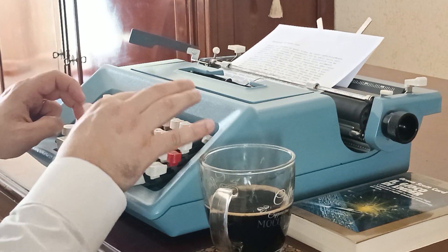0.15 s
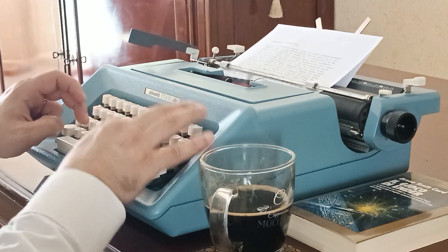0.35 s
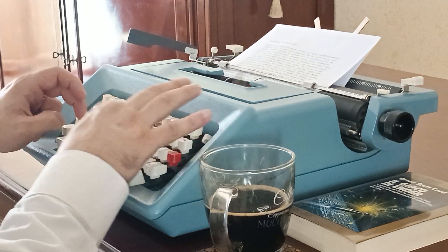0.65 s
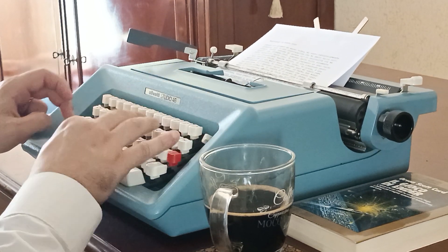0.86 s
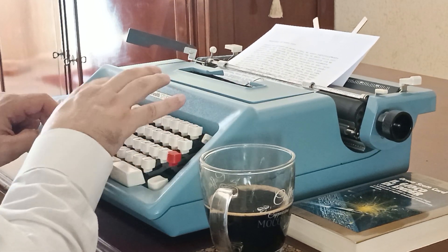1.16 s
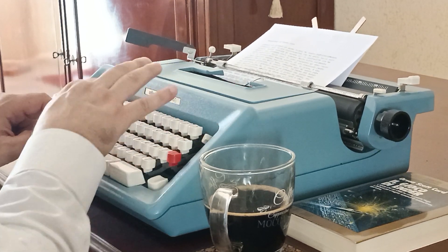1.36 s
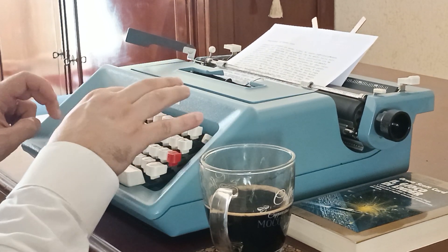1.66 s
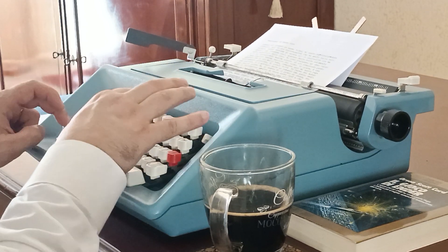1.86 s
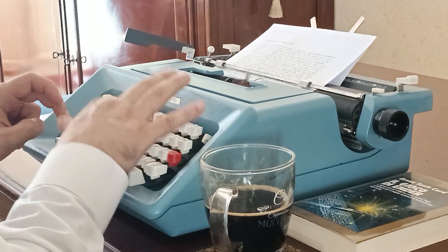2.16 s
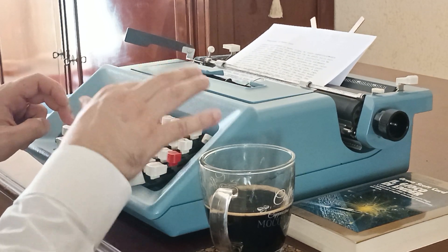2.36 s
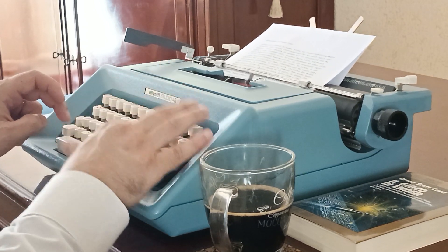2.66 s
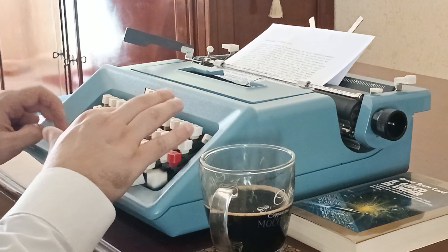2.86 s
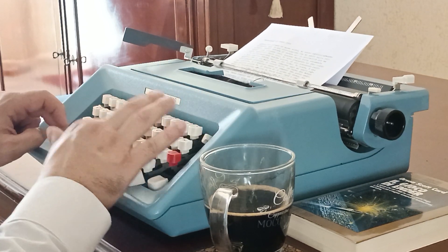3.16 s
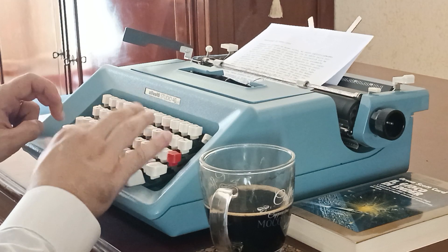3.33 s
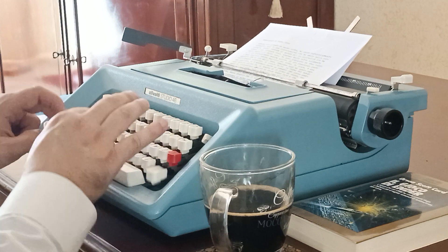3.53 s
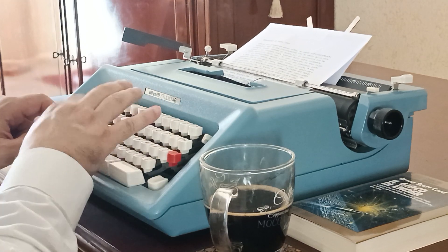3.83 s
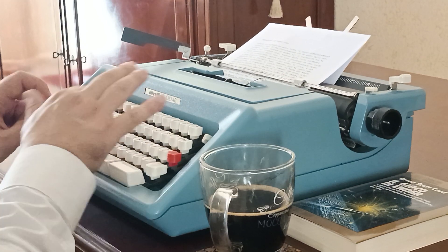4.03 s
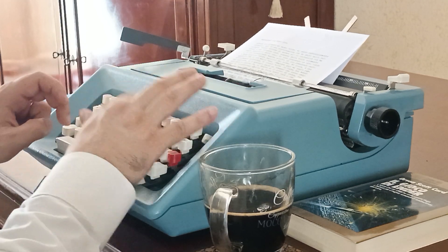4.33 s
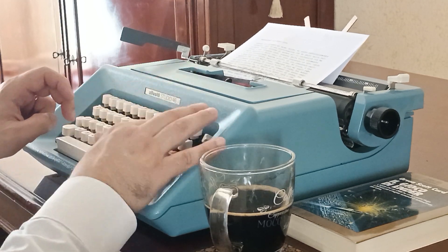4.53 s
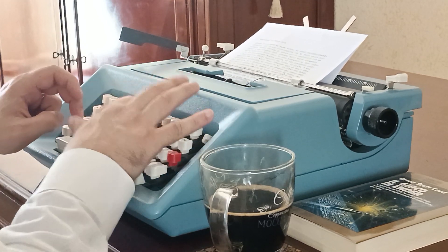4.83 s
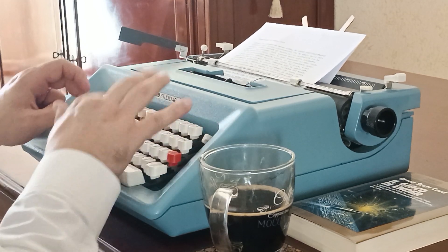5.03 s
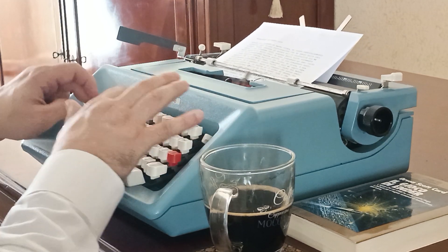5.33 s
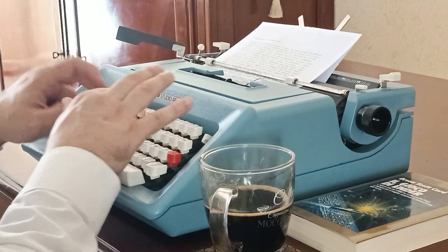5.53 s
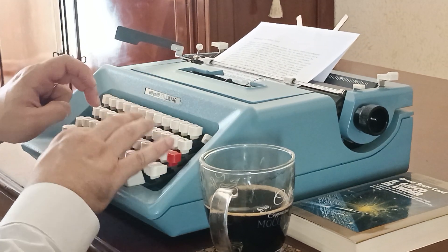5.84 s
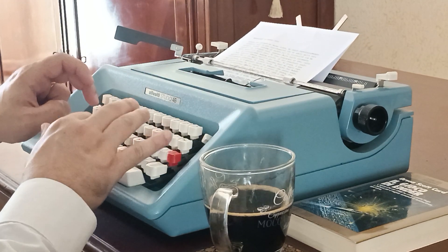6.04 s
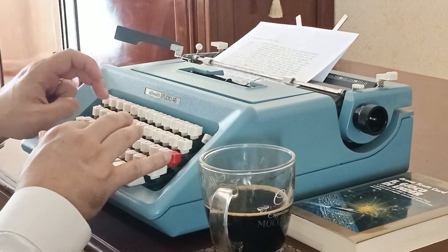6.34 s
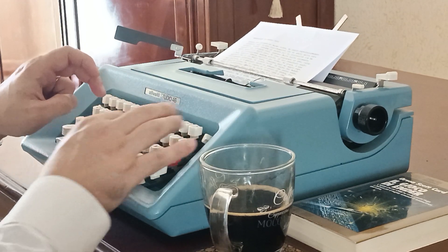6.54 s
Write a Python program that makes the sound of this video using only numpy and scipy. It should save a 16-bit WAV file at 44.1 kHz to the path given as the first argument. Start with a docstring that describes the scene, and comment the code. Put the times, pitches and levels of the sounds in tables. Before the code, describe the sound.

Close manual typewriter in a small quiet room: fifteen sharp, bright key clacks, unevenly spaced, with dull carriage clunks and small lever ticks between.

```python
"""A manual typewriter on a wooden desk in a small quiet room, close to a stereo microphone.
Each letter: the key goes down, the slug slaps the platen, the carriage steps on, the typebar drops back.
Space bar and shift linkage knock in between. Blows are coloured noise chatter; platen, linkage, case
and desk are dying modes. Each layer gets near echoes and a room tail, over a soft swelling noise."""
import sys
import numpy as np
from scipy import signal
from scipy.fft import rfft, irfft
from scipy.io import wavfile
from scipy.ndimage import uniform_filter1d

SR = 44100
rng = np.random.default_rng(int(sys.argv[2]) if len(sys.argv) > 2 else 0)


def wav_record(signal):
    """Record a signal, one row per channel, as 16-bit PCM in the file named by sys.argv[1]."""
    frames = np.transpose(np.atleast_2d(signal))
    bounded = np.clip(frames, -1, 1)
    # unit amplitude maps onto the largest positive 16-bit level
    quanta = np.round(bounded * 32767).astype(np.int16)
    wavfile.write(sys.argv[1], SR, quanta)


N = 295029

# Letters: (slug hit time [s], blow level [dB], slap tilt [dB per octave], extra top [dB],
# key lead before the slug [s], key rattle [dB], carriage step [dB], push into the case [dB])
LETTERS = [(0.0602, -8.5, -1.5, 0.5, 0.034, -29.5, -26, -37.5), (0.43, -6, 0.8, 0, 0.039, -34, -33, -30.5),
           (0.6956, -5, 0.3, -5, 0.038, -30.5, -23, -29), (1.3395, -6, 4, -3.5, 0.041, -35, -33.5, -30),
           (2.2285, -4.5, 0.5, -6.5, 0.036, -38, -24.5, -28),
           (2.7458, -5.5, 1.2, -2, 0.038, -32, -22.5, -29.5),
           (3.2009, -8.5, -1.5, 5.5, 0.039, -36.5, -31.5, -31.5),
           (4.002, -6, 2, 0.5, 0.038, -29.5, -31, -31), (4.372, -6.5, 0.3, 1, 0.041, -32, -24, -25),
           (4.6437, -6.5, 0.2, 1, 0.037, -32, -31.5, -27), (4.9862, -4.5, 0, -4, .0379, -40.5, -23.5, -27),
           (5.214, -7, -0.4, -1.5, 0.03, -35.5, -24, -27.5),
           (5.3932, -9.5, -0.2, 5.5, 0.036, -31.5, -23.5, -33),
           (5.5172, -6.5, -0.6, -2.5, 0.044, -30.5, -26, -29), (5.7213, -7, -1.5, -1, 0.032, -35, -22, -37)]
# Colour of the slug slapping paper and platen: (frequency [Hz], relative density [dB per Hz])
SLAP_COLOUR = [(240, -36), (400, -32), (899, -13.5), (1100, -14), (1500, -13.5), (2400, -2.5), (3370, -4),
               (3760, -10), (5550, -12), (7350, -15), (9570, -23.5), (12200, -19), (15000, -20.5),
               (15700, -46.5), (16500, -43.5)]
# Colour of the key going down: (frequency [Hz], relative density [dB per Hz])
KEY_COLOUR = [(240, -12), (400, -1.5), (1100, -14), (2290, -4.5), (3170, -11), (5460, -12.5),
              (14600, -16.5), (16500, -27)]
# Colour of the slug touching its guide: (frequency [Hz], relative density [dB per Hz])
BOUNCE_COLOUR = [(1200, -21.5), (2400, 4.5), (4500, -20)]
# Close platen modes, whose mix makes the clack throb:
# (frequency [Hz], level under the blow [dB], 60 dB decay before the closing fade [s])
PLATEN_MODES = [(2176, -32.5, 0.034), (2295, -23, 0.12), (2410, -12.5, 0.087), (2630, -14, 0.17),
                (2830, -21.5, .07), (3230, -24.5, .07), (3300, -26, 0.14)]
# Songs of the slap along the line: (frequency [Hz], first letter boost [dB], last letter boost [dB])
SLAP_SONGS = [(5400, 0, 10), (7130, 5.5, -1)]
SLUG_DB = -9  # slug chatter, relative to the blow
KEY_PUSH_DB = -6  # key into the case, relative to the slug's push
SOFT_DB_PER_OCTAVE = -3  # finger and rubber platen drive mostly the low modes
BOUNCE_S, BOUNCE_DB = 0.0085, -11.5  # rebound after the slap, relative to the blow
JINGLE_DB = -23.5  # loose levers, relative to the blow
STEP_S = 0.061  # slug on paper to carriage on the next tooth
HARD_DB_PER_OCTAVE = 0.5  # metal stops drive the upper case modes more than fingers do


def type_letters(clack, platen, tick, thud, body):
    """Key press, slap with ringing platen, slug rebound with loose levers, then the carriage step."""
    for k, letter in enumerate(LETTERS):
        hit_s, db, tilt, top_db, lead_s, key_db, step_db, push_db = letter
        key_s = hit_s - lead_s
        add(clack, key_s, blow(KEY_COLOUR, key_db, rattle_s=0.028, grain_db=5.0, rise_s=0.00099))
        push_case(body, key_s, push_db + KEY_PUSH_DB, rise_s=0.014, tilt=SOFT_DB_PER_OCTAVE)

        # one song grows and the other fades as the carriage moves along the line
        along = k / (len(LETTERS) - 1)
        songs = [(hz, first + (last - first) * along) for hz, first, last in SLAP_SONGS]
        slap = blow(SLAP_COLOUR, db + SLUG_DB, rattle_s=0.0014, grain_db=5.5,
                    tilt=tilt, top_db=top_db, songs=songs)
        add(clack, hit_s, slap)
        platen_ring = ring(PLATEN_MODES, db, spread_db=2.5, rise_s=0.0016, detune=0.012,
                           loose=0.6, size=8192)
        add(platen, hit_s, platen_ring)
        push_case(body, hit_s, push_db, tilt=SOFT_DB_PER_OCTAVE)

        bounce_s = hit_s + BOUNCE_S
        bounce = blow(BOUNCE_COLOUR, db + BOUNCE_DB, rattle_s=0.001, grain_db=2.5, rise_s=0.0004)
        add(thud, bounce_s, bounce)
        add(tick, bounce_s, knock(db + JINGLE_DB, rattle_s=0.04, grain_db=8.0))
        step_carriage(thud, body, hit_s + STEP_S, step_db, rise_s=0.0032, tilt=HARD_DB_PER_OCTAVE)


# Colour of the carriage landing on its next tooth: (frequency [Hz], relative density [dB per Hz])
STEP_COLOUR = [(250, -14.5), (450, -4), (720, -1), (1100, -11.5), (1700, -2.5), (3000, -19), (8000, -28)]
STEP_PUSH_DB = -2.5  # into the case, relative to the step


def step_carriage(thud, body, time_s, db, rise_s, tilt):
    """The carriage meets the next tooth with a dull blow and rings the case."""
    add(thud, time_s, blow(STEP_COLOUR, db, rattle_s=0.008, grain_db=1.65, rise_s=rise_s))
    push_case(body, time_s, db + STEP_PUSH_DB, tilt=tilt)


# Typebars and levers falling back on their rests: (time [s], level [dB])
DROPS = [(0.189, -29.5), (0.5546, -29.5), (0.8201, -28), (1.4519, -29), (2.347, -28.5), (2.8616, -28),
         (3.3036, -26.5), (4.1032, -21.5), (4.122, -27.5), (4.477, -27.5), (4.763, -28.5), (5.1088, -28),
         (5.3355, -27), (5.6422, -28.5), (5.85, -25.5), (5.893, -32)]
# Colour of those falls: (frequency [Hz], relative density [dB per Hz])
DROP_COLOUR = [(410, -21), (700, -7), (1300, -5), (2490, 1.5), (2700, 0.5), (8300, -8.5), (11900, -10.5),
               (15700, -13.5), (16500, -41)]
DROP_PUSH_DB = -1  # into the case, relative to the fall


def drop_typebars(tick, body):
    """Falling typebars and levers tick on their rests and push the case."""
    for time_s, db in DROPS:
        add(tick, time_s, blow(DROP_COLOUR, db, rattle_s=0.0025, grain_db=4.0, rise_s=0.0024))
        push_case(body, time_s, db + DROP_PUSH_DB)


# Space bar, and first the end of an earlier stroke at 0.0014 s: (time [s], knock level [dB],
# knock tilt [dB per octave], carriage step [dB], push into the case [dB])
STROKES = [(0.0014, -27.5, -4, -34.5, -45.5), (1.108, -35.5, 0.5, -24, -31.5),
           (1.581, -33, -5.5, -36.5, -25), (2.986, -32.5, -3, -25.5, -28), (3.374, -32, 0.5, -32.5, -25),
           (3.679, -36.5, -1, -28, -27)]
STROKE_RISE_S = 0.0007
FREED_DB_PER_OCTAVE = 4.5  # the freed carriage knocks fuller and higher


def end_stroke_and_press_space_bar(clack, thud, body):
    """The end of an earlier stroke, then the space bar: a knock, a case push and a carriage step at once."""
    for time_s, db, tilt, step_db, push_db in STROKES:
        add(clack, time_s, knock(db, rattle_s=0.005, grain_db=2.5, rise_s=STROKE_RISE_S, tilt=tilt))
        push_case(body, time_s, push_db)
        step_carriage(thud, body, time_s, step_db, STROKE_RISE_S, FREED_DB_PER_OCTAVE)


# Shift linkage clatter: (time [s], knock level [dB], knock tilt [dB per octave],
# ring of the linkage [dB], push into the case [dB])
CLATTERS = [(0.917, -33, -1.6, -37.5, -47), (0.943, -32, -1.5, -32, -37), (1.039, -31, 0, -56.5, -28),
            (1.048, -37, -4.5, -27, -38), (1.567, -23.5, 4, -58.5, -32), (3.4442, -34.5, -1.5, -53.5, -37),
            (3.475, -32, -1.5, -37, -32.5), (3.497, -42.5, -1.5, -48.5, -42), (3.583, -36.5, 1, -31, -38),
            (3.597, -32, -1, -23, -28), (6.0061, -29.5, 0, -25, -62), (6.016, -33.5, 1, -23.5, -35.5),
            (6.031, -41, 1, -25, -33)]
# Linkage modes: (frequency [Hz], relative level [dB], 60 dB decay before the closing fade [s])
LINK_MODES = [(1274, -5.5, 0.066), (1870, -4.5, 0.036), (2592, -2, 0.039), (2724, -4.5, 0.041),
              (3400, -3.5, .04)]
CLATTER_S = 0.0043  # decay constant of each knock


def clatter_shift(tick, thud, body):
    """The shift linkage knocks and rings in its own modes, and pushes the case."""
    for time_s, db, tilt, link_db, push_db in CLATTERS:
        add(tick, time_s, knock(db, CLATTER_S, grain_db=5.0, rise_s=0.3 * CLATTER_S, tilt=tilt))
        push_case(body, time_s, push_db, tilt=HARD_DB_PER_OCTAVE)
        link_ring = ring(LINK_MODES, link_db, spread_db=5.0, rise_s=0.003, tilt=2 * tilt,
                         detune=0.034, size=4096)
        add(thud, time_s, link_ring)


# Colour of the strokes above, linkage and loose levers: (frequency [Hz], relative density [dB per Hz])
KNOCK_COLOUR = [(290, -25), (500, -20.5), (1050, -16.5), (1260, -14.5), (1500, -13.5), (2730, -9),
                (9330, -23.5), (12000, -19), (15800, -28), (16500, -36.5)]


def knock(db, rattle_s, grain_db, **shape):
    """A chattering knock in one shared colour."""
    return blow(KNOCK_COLOUR, db, rattle_s, grain_db, **shape)


# Case and desk top modes: (frequency [Hz], relative level [dB], 60 dB decay before the closing fade [s])
CASE_MODES = [(70.5, -14, 0.12), (115.7, -10, 0.24), (177.1, -2, 0.11), (291.5, -12, 0.11),
              (359.2, -12.5, 0.17), (454.6, -1, 0.1), (586, -11, 0.093), (651.7, -9, 0.13),
              (746.5, -8, 0.14), (970, -12, 0.065)]


def push_case(body, time_s, db, **shape):
    """A push sets the modes of case and desk top ringing."""
    add(body, time_s, ring(CASE_MODES, db, **shape))


def blow(colour, db, rattle_s, grain_db, rise_s=1 / SR, tilt=0, top_db=0, songs=(), size=8192):
    """A dying noise chatter of small uneven contacts, filtered to the colour of the parts."""
    t = np.arange(1, size + 1) / SR
    hz = np.fft.rfftfreq(size, 1 / SR)
    noise = rng.standard_normal(size)
    unevenness = gain_of(grain_db * rng.exponential(1, size))
    envelope = (1 - np.exp(-t / rise_s)) * np.exp(-t / max(rattle_s, 1 / SR)) * (t < 0.1)
    chatter = rfft(noise * unevenness * envelope)

    # take out the chatter's own broad colour
    own_db = 10 * np.log10(uniform_filter1d(abs(chatter) ** 2, size=61) + 1e-9)
    # each song is a bump 0.14 octave wide either side, to 1/e of its boost
    song_db = sum(boost * np.exp(-(np.log2((hz + 1) / f) / 0.14) ** 2) for f, boost in songs)
    tilt_db = tilt * np.log2((hz + 50) / 2500)
    treble_db = top_db / (1 + (9500 / (hz + 1)) ** 10)  # the top begins near 9500 Hz
    colour_db = read(colour, hz) - own_db + song_db + tilt_db + treble_db

    sound = irfft(chatter * causal(colour_db))
    sound = sound * signal.windows.tukey(2 * size, 0.5)[size:]
    # level is the total energy, referred to 4.3 ms
    return gain_of(db) * sound / np.sqrt(np.sum(sound ** 2) / (SR * 0.0043))


def ring(modes, db, spread_db=2.5, rise_s=0.011, tilt=0, detune=0.036, loose=1.47, size=11025):
    """Dying modes; each ring draws slightly different shares, pitches and phases."""
    t = np.arange(size) / SR
    hz, mode_db, t60 = np.transpose(modes)[:, :, None]
    share, pitch, phase = rng.standard_normal((3, len(modes), 1))
    level_db = db + mode_db + tilt * np.log2(hz / np.median(hz)) + spread_db * share
    opposite = np.pi * np.arange(len(modes))[:, None]  # neighbours in opposite sense, before the phase draw
    angle = 2 * np.pi * hz * (1 + detune * pitch) * t + loose * phase + opposite
    rings = gain_of(level_db - 60 * t / t60) * np.sin(angle)
    rise = 1 - np.exp(-t / rise_s)
    return rings.sum(0) * rise * signal.windows.tukey(2 * size, 1)[size:]


def typewriter():
    """Five layers: bright blows, platen ring, light ticks, dull thuds and the ringing case."""
    clack, platen, tick, thud, body = np.zeros((5, N))
    type_letters(clack, platen, tick, thud, body)
    drop_typebars(tick, body)
    end_stroke_and_press_space_bar(clack, thud, body)
    clatter_shift(tick, thud, body)
    return clack, platen, tick, thud, body


# Decay of the room tail before shaping and closing fade: (frequency [Hz], 60 dB decay [s])
ROOM_DECAY = [(100, 0.97), (260, 0.86), (700, 0.5), (1840, 0.43), (4850, 0.41), (12800, 0.25)]
# Nearest surfaces, before the stereo shaping: (delay at the left [s], left level [dB], right level [dB])
ECHOES = [(.0085, -6, -13), (0.0175, -18.5, -10.5), (0.021, -14, -22.5), (0.046, -11, -13)]
DIRECT_DB, DIRECT_S = -1.5, 0.00031
LEFT_LEADS_S = 0.00013  # direct sound and echoes reach the right this much later, plus 4% of the delay


def room(tail_db, start_s=0.00067, size=32768):
    """Direct sound, near echoes, then sparse uneven taps whose bands die at their own speeds."""
    taps = np.zeros((2, size))
    at = np.arange(0, size - 16, 16) + rng.integers(0, 16, (2, size // 16 - 1))
    signs = rng.choice([-1., 1.], at.shape)
    tap_db = 2.6 * np.minimum(rng.exponential(1, at.shape), 4)
    np.put_along_axis(taps, at, signs * gain_of(tap_db), 1)

    hz, t, bands = signal.stft(taps, SR, nperseg=256)
    decay = gain_of(-60 * t / read(ROOM_DECAY, hz)[:, None])
    tail = signal.istft(bands * decay, SR, nperseg=256)[1][:, :size]
    t = np.arange(size) / SR
    early = 1 + 0.4 * np.exp(-t / 0.0098)  # desk and near wall scatter early
    tail = tail * (1 - np.exp(-t / start_s)) * early

    hz = np.fft.rfftfreq(size, 1 / SR)
    heard = gain_of(tail_db) * paired(*rfft(tail / np.linalg.norm(tail[0])), hz)
    for delay_s, *db in [(DIRECT_S, DIRECT_DB, DIRECT_DB)] + ECHOES:
        lag_s = delay_s * np.array([[1], [1.04]]) + [[0], [LEFT_LEADS_S]]
        heard = heard + gain_of(db)[:, None] * np.exp(-2j * np.pi * hz * lag_s)
    return irfft(microphone_pair(heard, hz)) * signal.windows.tukey(2 * size, 0.5)[size:]


# Microphone pair turned to the machine: (frequency [Hz], left minus right gain [dB])
PAIR_LEAN = [(100, .5), (1900, .3), (4000, -2.5), (7500, -1.5), (10500, 7), (15000, 11)]
BASS_ALIKE_HZ = 332  # below this the close microphones hear nearly the same


def microphone_pair(heard, hz):
    """Close microphones: the bass is narrowed and each frequency leans left or right."""
    mid = heard.mean(0)
    width = np.hypot(0.45, hz / BASS_ALIKE_HZ) / np.hypot(1, hz / BASS_ALIKE_HZ)
    heard = mid + (heard - mid) * width
    half_lean_db = read(PAIR_LEAN, hz) / 2
    return heard * [causal(half_lean_db), causal(-half_lean_db)]


# Colour of the room tone: (frequency [Hz], relative density [dB per Hz])
AIR_COLOUR = [(15, -35.5), (25, -21.5), (48, -7), (172, -13.5), (214, -9.5), (266, -16.5), (288, -23),
              (349, -23.5), (2600, -33.5), (8370, -48.5), (15200, -48), (16500, -46.5)]
AIR_DB = -56.5  # level around which the tone swells


def room_tone():
    """Soft noise of the house, its level swelling slowly by a sum of sines from 0.3 to 6 Hz."""
    hz = np.fft.rfftfreq(N, 1 / SR)
    t = np.arange(N) / SR
    spectra = paired(*rfft(rng.standard_normal((2, N))), hz)
    noise = irfft(spectra * gain_of(read(AIR_COLOUR, hz)), N)
    waves = [np.sin(2 * np.pi * (f * t + rng.random())) for f in np.geomspace(0.3, 6, 12)]
    swell = sum(waves) / np.sqrt(6)
    return gain_of(AIR_DB + 0.8 * swell) * noise / noise.std()


# Left-right likeness of tail and room tone: (frequency [Hz], likeness [0 to 1])
LIKENESS = [(60, 0.97), (250, 0.9), (600, 0.7), (1200, .1), (8000, 0.089)]


def paired(a, b, hz):
    """Two channels from two independent spectra, alike in the bass and unlike in the treble."""
    same = np.clip(read(LIKENESS, hz), 0, 1)
    return np.array([a, same * a + np.sqrt(1 - same ** 2) * b])


def causal(db):
    """Minimum-phase response for a gain in dB given on rfft bins."""
    log_gain = np.log(gain_of(np.maximum(db, -90)))
    circle = np.concatenate([log_gain, log_gain[-2:0:-1]])
    return np.exp(log_gain - 1j * signal.hilbert(circle).imag[:len(db)])


def gain_of(db):
    """Amplitude factor for a level in dB."""
    return 10 ** (np.asarray(db) / 20)


def read(points, hz):
    """Table value at each frequency, interpolated along log frequency."""
    f, value = np.transpose(points)
    return np.interp(np.log(hz + 1), np.log(f + 1), value)


def add(layer, time_s, sound):
    """Mix a sound into a layer from a given time, cut at the layer's end."""
    part = layer[round(time_s * SR):][:len(sound)]
    part += sound[:len(part)]


def scene():
    """Every layer of the machine through its room responses, over the room tone."""
    clack, platen, tick, thud, body = typewriter()
    # each 4000-sample stretch of the bright layer gets one of four room responses drawn at random
    response = np.repeat(rng.integers(0, 4, N // 4000 + 1), 4000)[:N]
    parts = [(clack * (response == k), 4.5) for k in range(4)]  # (layer, room tail level [dB])
    parts += [(platen, -5.5), (tick, 3.2), (thud, -4.5), (body, -7.5)]
    out = room_tone()
    for sound, tail_db in parts:
        out = out + signal.fftconvolve(sound[None], room(tail_db), axes=1)[:, :N]
    return out


def record(dry):
    """The microphone loses the deepest bass, the input rounds off high peaks; then the band limit."""
    bass_cut = signal.butter(4, 58, "high", fs=SR, output="sos")
    thin = signal.sosfilt(bass_cut, dry)
    rounded = 0.95 * np.tanh(thin / 0.95)
    band_limit = signal.firwin(511, 15900, window=("kaiser", 9), fs=SR)
    return signal.oaconvolve(rounded, band_limit[None], "same")


dry = scene()
out = record(dry)
wav_record(out)
```